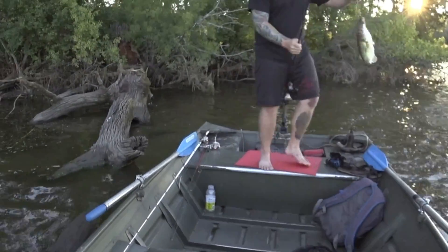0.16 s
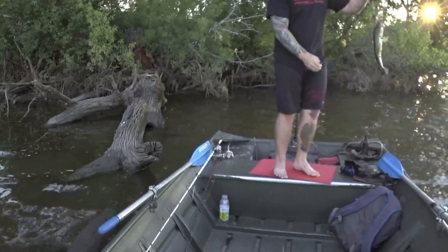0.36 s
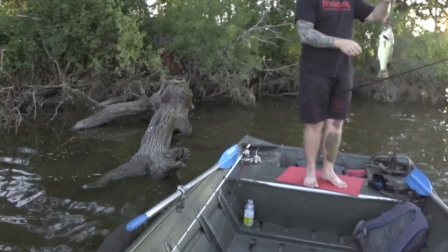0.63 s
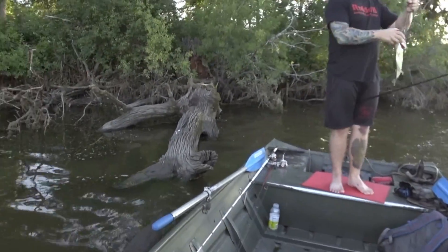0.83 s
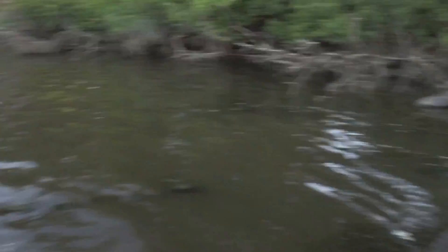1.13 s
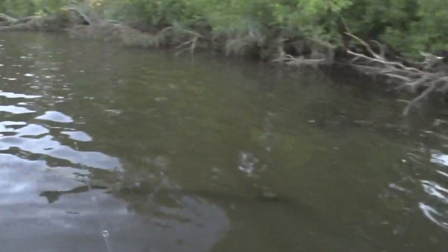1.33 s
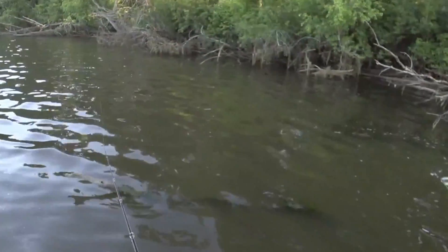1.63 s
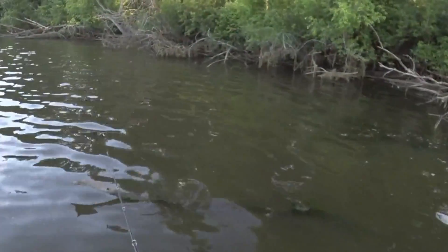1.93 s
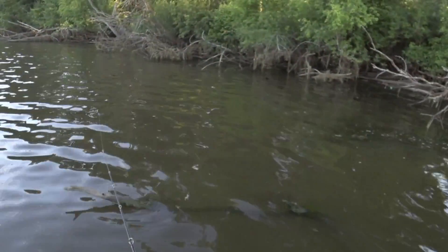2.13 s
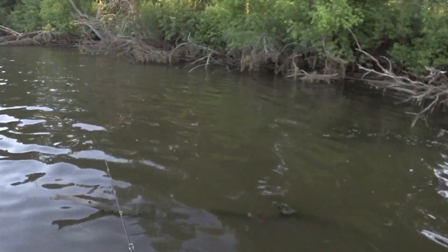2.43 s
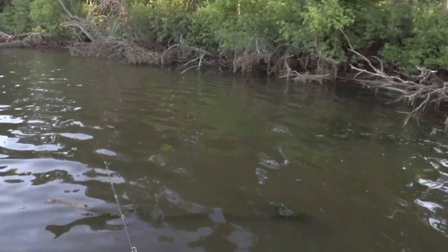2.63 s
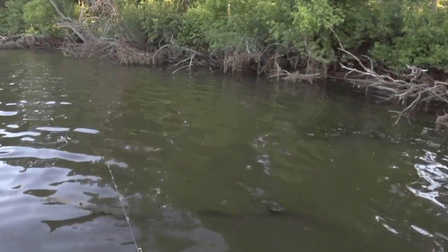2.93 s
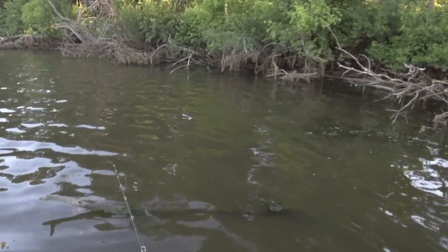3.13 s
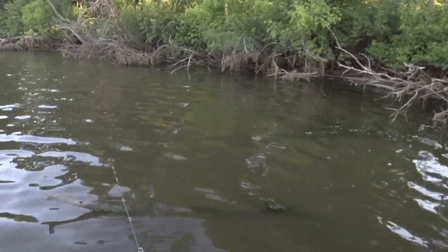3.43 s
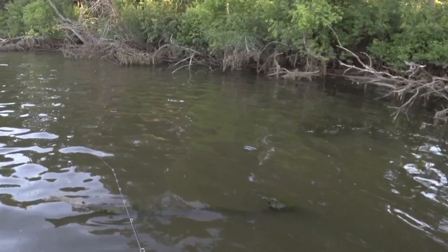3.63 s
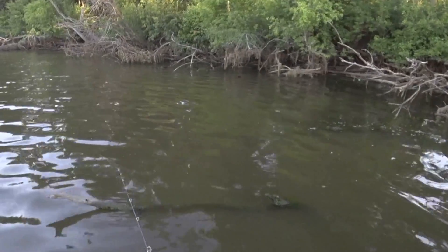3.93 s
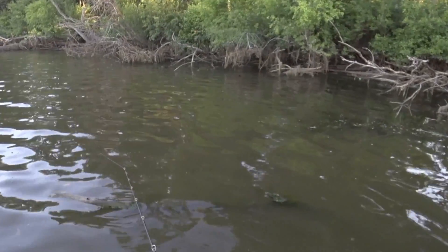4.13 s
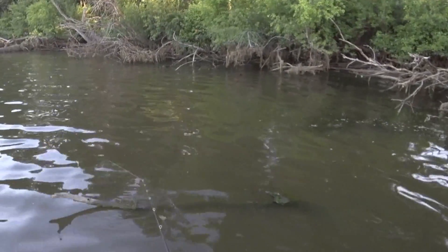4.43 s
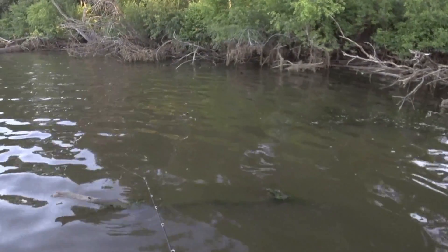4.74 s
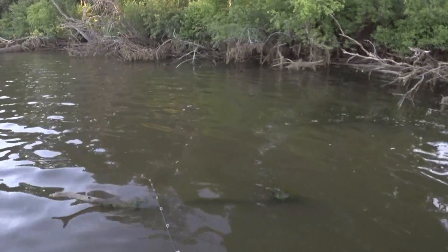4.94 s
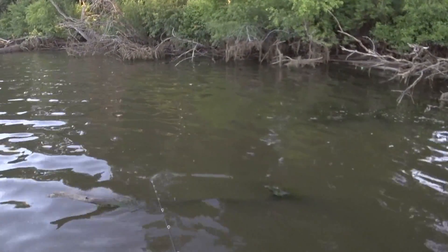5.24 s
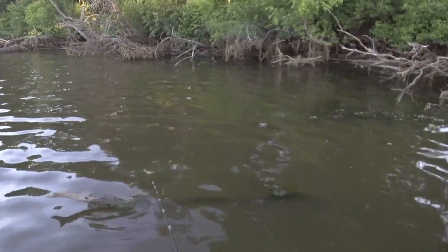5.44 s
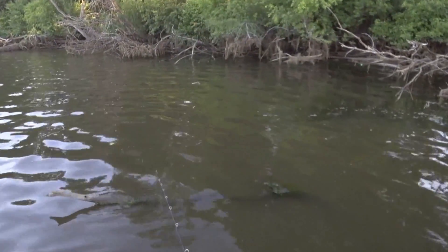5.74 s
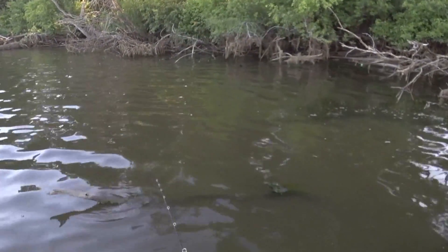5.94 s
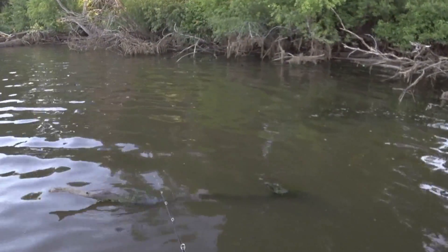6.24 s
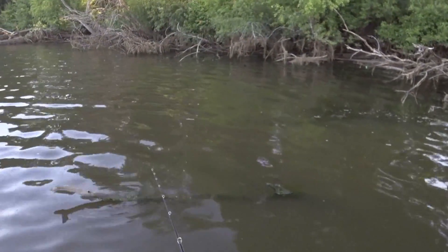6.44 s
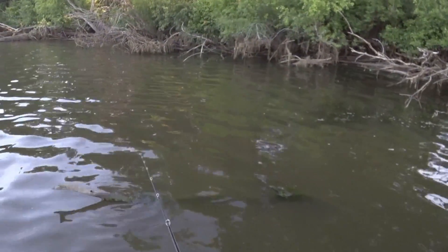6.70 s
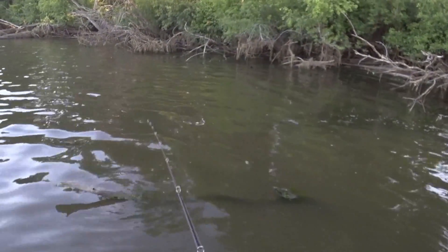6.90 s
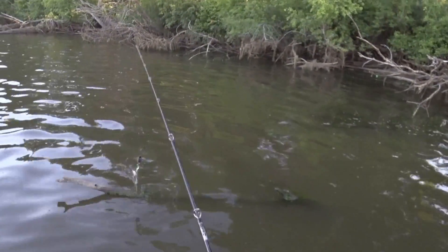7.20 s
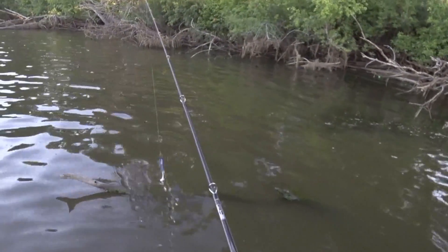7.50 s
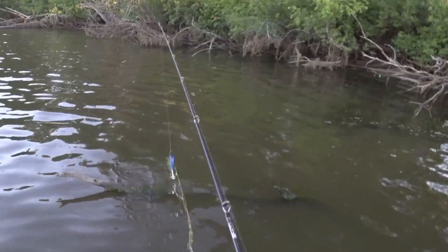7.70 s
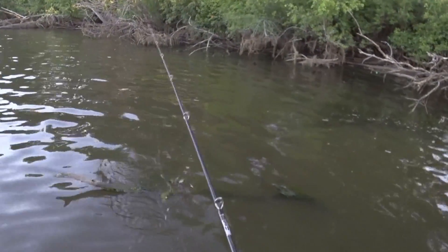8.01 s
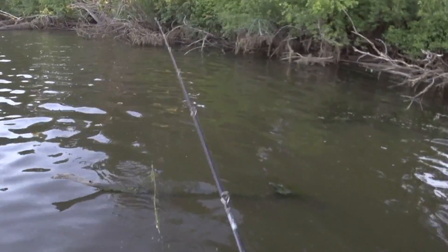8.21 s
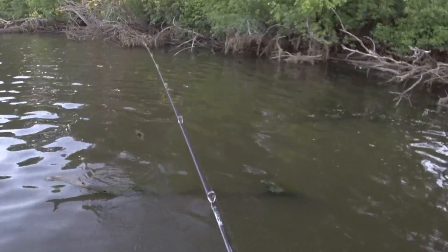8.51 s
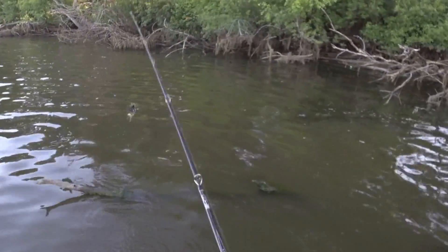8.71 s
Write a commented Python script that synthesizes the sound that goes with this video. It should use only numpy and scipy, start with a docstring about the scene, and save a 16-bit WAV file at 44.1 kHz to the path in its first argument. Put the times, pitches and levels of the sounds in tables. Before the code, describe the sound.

Quiet lake fishing: resonant hull thuds, small clicks, camera-handling bumps and watery plops, with thin whistles from the trees and a low wash.

```python
"""Fishing from a small metal boat on a quiet lake, under a high hiss from a wooded shore.
First come hollow knocks (resonating hull panels), tackle ticks, rasps and thin whistles echoed by trees.
From 1.8 s the grip on the camera creaks, then bumps; near 2.7 s the first air pockets plop at the hull.
Near 3 s the line sizzles through the rod rings on the right and chirping bubbles gurgle along the hull.
Knocks, plops, bumps and whistles go on, with two more gurgles near 8 s, over the low wash of the lake."""
import sys
import numpy as np
from scipy import signal
from scipy.fft import rfft, irfft
from scipy.io import wavfile
from scipy.ndimage import uniform_filter1d

SR = 44100
rng = np.random.default_rng(int(sys.argv[2]) if len(sys.argv) > 2 else 0)


def bounce(signal):
    """Save signal as a 16-bit WAV file at the path given by the first command-line argument."""
    frames = np.transpose(np.atleast_2d(signal))
    limited = np.clip(frames, -1, 1)
    pcm = np.round(limited * 32767).astype(np.int16)
    wavfile.write(sys.argv[1], SR, pcm)


N = 390726
TIME = np.arange(N) / SR
SIZE = 16384  # samples in the response to one blow
T = np.arange(SIZE) / SR
HZ = np.fft.rfftfreq(SIZE, 1 / SR) + 1  # raised by 1 Hz to keep logarithms finite
LEAD_IN = .006  # s of room ahead of the centre of a blow
PORTS = np.array([[1], [-1]])  # opposite signs for the left and right microphone ports


def amp(db):
    """Level to amplitude: 20 dB is a factor of ten."""
    return 10 ** (np.asarray(db) / 20)


def evened(x):
    """Normalisation to a root-mean-square value of 1."""
    return x / np.sqrt(np.mean(x ** 2) + 1e-20)


def read(points, hz):
    """A spectrum joined by straight lines on a log-frequency axis."""
    f, value = np.transpose(points)
    return np.interp(np.log(hz + 1), np.log(f), value)


def follow(curve, t):
    """Linear interpolation of a curve in time."""
    return np.interp(t, *np.transpose(curve))


def add(mix, s, sound):
    """Superposition: pressures add from s seconds on, cut at the end of the mix."""
    part = mix[:, max(round(s * SR), 0):][:, :sound.shape[1]]
    part += sound[:, :part.shape[1]]


def band(hz, octaves):
    """A resonance bell, Gaussian on the log-frequency axis."""
    return np.exp(-(np.log2(HZ / hz) / (2 * octaves)) ** 2)


def blow(gain):
    """Zero-phase impact: a short symmetric wavelet with this spectrum, centred on the lead-in."""
    return gain * np.exp(-2j * np.pi * HZ * LEAD_IN)


def causal(gain):
    """The minimum-phase response with this gain: it starts sharply and rings afterwards."""
    log_gain = np.log(gain / gain.max() + 1e-4)
    circle = np.concatenate([log_gain, log_gain[-2:0:-1]])
    return np.exp(np.conj(signal.hilbert(circle)))[:len(HZ)]


def contacts(envelope, per_s):
    """Repeated impact: random separate bounces of uneven size under an envelope, of energy 1."""
    train = (rng.random(SIZE) < per_s / SR) * rng.standard_normal(SIZE) * envelope
    return rfft(train / (np.linalg.norm(train) + 1e-12))


def scatter(envelope, same):
    """Diffuse reverberation: dense noise under an envelope, partly alike at both ports, of energy near 1."""
    shared, *own = rng.standard_normal((3, SIZE))
    same = np.clip(same, 0, 1)
    noise = np.sqrt(same) * shared + np.sqrt(1 - same) * np.array(own)
    return rfft(noise * envelope / np.linalg.norm(envelope))


def ports(spectrum, db, pan_db, lead):
    """Interaural-style level and phase (lead/rad) differences; db is the blow's energy spread over 10 ms."""
    level = amp(pan_db / 2 * PORTS)
    phase = np.exp(.5j * lead * PORTS)
    pair = irfft(spectrum * level * phase)
    return amp(db) * evened(pair) * np.sqrt(SR / 10 ** 2 / SIZE)


def air(colour_db, same, patchy_db):
    """Partly coherent stereo noise with drifting patches; colour_db(t, hz) gives its relative spectrum."""
    frames, hz = N // 256 + 5, np.fft.rfftfreq(1024, 1 / SR)
    a, b, c, d, patches = rng.standard_normal((frames, 513, 5)).T
    patches = uniform_filter1d(patches, size=5, axis=0)
    patches = evened(uniform_filter1d(patches, size=9, axis=1))
    same, left = np.clip(same, -1, 1), a + 1j * b
    right = same * left + np.sqrt(1 - same ** 2) * (c + 1j * d)
    t = np.arange(frames) * 256 / SR
    z = np.array([left, right]) * amp(colour_db(t, hz[:, None]) + patchy_db * patches)
    return evened(signal.istft(z, nperseg=1024, noverlap=768)[1][:, :N])


def knocks(first=0.12, start=0.55, attack_cycles=1.9, t60=0.15, damping=0.34, wash_db=-2.5, tail_db=-14.5,
           tail_t60=0.33, body_db=-9, note_db=-2, note_octaves=0.029, lead=0.67, uneven_db=3):
    """Impact on resonant panels: each blow swells by bouncing about the hull, then darkens as it rings on."""
    # hollow knocks in the hull: t/s, level/dB, f/Hz, width/octaves, swell/s, left over right/dB
    knock_list = [(0.043, -29, 1946, 0.14, 0.007, .5), (0.119, -57.5, 440, 0.4, .004, 1),
                  (0.682, -40.5, 1536, 0.17, 0.024, 4), (.688, -50.5, 525, 0.37, 0.0032, 1),
                  (.732, -44.5, 2550, 0.14, 0.0062, 1), (1.117, -50, 473, 0.9, 0.017, -2.5),
                  (1.278, -37.5, 1830, 0.12, .012, -6), (1.285, -49, 780, 0.4, 0.0051, -6),
                  (1.416, -50.5, 825, 0.63, 0.0041, -11), (1.422, -40, 2900, 0.18, 0.00087, -5),
                  (1.497, -37, 503, 0.22, 0.019, -2), (1.521, -30, 872, 0.23, .0026, -6),
                  (1.524, -45.5, 3110, 0.056, 0.0017, -4), (1.629, -44.5, 800, 0.23, 0.0012, -7.5),
                  (1.814, -33, 748, 0.31, 0.017, -5.5), (1.951, -42.5, 483, 0.34, 0.0019, -3),
                  (2.065, -51, 3220, 0.091, .003, 5), (2.37, -35, 1400, 0.21, 0.0068, -3),
                  (2.737, -42, 478, 0.29, 0.012, -5), (2.909, -33.5, 1227, 0.2, 0.016, -7),
                  (3.464, -56, 670, 0.19, 0.0072, -2), (3.809, -30.5, 746, 0.47, 0.0039, -6),
                  (3.835, -29, 814, 0.42, 0.019, -5), (4.292, -31, 1965, 0.17, 0.007, -7),
                  (4.702, -35.5, 540, 0.27, 0.0054, -2), (4.889, -46, 1750, 0.21, 0.016, -4),
                  (5.462, -42, 2810, 0.1, 0.003, -3), (5.466, -46, 2070, 0.3, 0.0097, -7),
                  (5.846, -45.5, 490, 0.22, 0.0041, 8), (6.089, -28, 980, 0.32, 0.019, -4),
                  (6.09, -46.5, 546, 0.4, 0.016, 1), (6.086, -38.5, 1830, 0.15, 0.0018, -3),
                  (6.81, -41.5, 486, 0.27, 0.025, -3.5), (7.542, -47, 2210, 0.1, 0.011, -3),
                  (7.874, -55, 2820, 0.45, 0.0096, -2), (7.96, -44, 1086, 0.24, 0.0078, -5.5),
                  (8.115, -38, 728, 0.18, 0.021, -4.5), (8.209, -43.5, 2970, 0.11, 0.0032, 3),
                  (8.213, -47, 2220, 0.2, 0.0068, -5), (8.378, -54.5, 2710, 0.36, 0.008, 2),
                  (8.668, -37.5, 640, 0.36, 0.014, -7)]
    # panel resonances of the hull: f/Hz, width/Hz, gain/dB
    hull = [(638, 13, 3), (1075, 24, 4), (1154, 56, 1.5), (1900, 46, -12.5)]
    out = np.zeros((2, N))
    panels = amp(sum(db / (1 + (2 * (HZ - hz) / width) ** 2) for hz, width, db in hull))
    for s, db, hz, octaves, swell, pan_db in knock_list:
        after = np.maximum(T - swell, 0) * (hz / 10 ** 3) ** damping  # high notes die sooner
        rise = np.interp(T, [0, swell], [start, 1]) * np.minimum(T * hz / attack_cycles, 1)
        clumps = np.interp(T, T[::SIZE // 64], rng.standard_normal(64))  # the late bounces come in clumps
        fast = rise * amp(-60 * after / t60)
        slow = rise * amp(uneven_db * clumps) * amp(-60 * after / tail_t60)
        dull = 1 / (1 + (HZ / hz / 1.3) ** 4)  # late reflections lose their top
        early = contacts(fast, per_s=1600) + amp(wash_db) * scatter(fast, same=0.92)
        late = dull * (scatter(slow, same=0.94) + contacts(slow, per_s=280))
        ring = early + amp(tail_db) * late
        # a broad thud with a hollow note in its middle; broad blows also stir the deeper body of the boat
        colour = band(hz, octaves) + amp(note_db) * band(hz, note_octaves)
        colour += amp(body_db) * octaves * band(np.sqrt(hz * 330), 0.68)
        colour /= 1 + (HZ / 3400) ** 16
        impact = blow(np.sqrt(colour)) * causal(np.sqrt(colour) * panels)
        add(out, s - LEAD_IN, ports(impact * (first + ring), db, pan_db, lead))
    return out


def plops(octaves_per_s=2.7, tail_db=-11, t60=.2, pan_db=-2.0):
    """Bubble resonance: a trapped pocket of air rings, rising a little in pitch, and the hull echoes it."""
    # round plops of water against the hull: t/s, level/dB, f/Hz, swell/s
    plop_list = [(2.737, -42.5, 610, 0.0031), (3.818, -31, 576, 0.0031), (3.868, -42, 616, 0.0047),
                 (4.723, -35.5, 573, 0.0045), (4.722, -54.5, 227, .005), (6.089, -31, 1166, 0.012),
                 (6.8214, -40.5, 570, 0.0022), (6.843, -51, 227, 0.0055), (8.135, -37.5, 778, 0.0032),
                 (8.659, -36, 590, 0.0037), (8.666, -35.5, 651, 0.011)]
    out = np.zeros((2, N))
    for s, db, hz, swell in plop_list:
        u = T / swell
        pitch = hz * 2 ** (octaves_per_s * (T - swell))
        note = (u * np.exp(1 - u)) ** 2 * np.sin(2 * np.pi * np.cumsum(pitch) / SR)
        echo = scatter(amp(-60 * T / t60), same=0.39)
        add(out, s, ports(rfft(note) * (1 + amp(tail_db) * echo), db, pan_db, 0.39))
    return out


def gurgles(per_s=100, low_hz=225, high_hz=590, cycles=1.46, top_octaves_per_s=28, top_spread_db=10, lead=1.5):
    """Bubble chirps: uneven small bubbles each ring for a few cycles as their pitch slides up."""
    # water gurgling along the hull: t/s, length/s, level/dB
    gurgle_list = [(3.07, 0.094, -55), (3.307, 0.17, -55.5), (7.819, 0.112, -52.5), (8.058, 0.15, -51)]
    out, t = np.zeros((2, N)), T[:SIZE // 8]
    for s, length, db in gurgle_list:
        run = np.zeros((2, 2 * SIZE))
        for k, (when, size, strength, glide, side) in enumerate(rng.random((60, 5))):
            at, hz = (k + when) / per_s, low_hz * (high_hz / low_hz) ** size
            if at < length:
                u = t * hz / cycles
                phase = 2 * np.pi * np.cumsum(hz * 2 ** (top_octaves_per_s * glide * t)) / SR
                shift = lead * (2 * side - 1) * PORTS  # up to lead/rad either way at each port
                pulse = (u * np.exp(1 - u)) ** 2 * np.sin(phase + shift)
                add(run, at, amp(top_spread_db * strength) * pulse)
        add(out, s, amp(db) * run / run[:, :int(length * SR)].std())
    return out


def ticks(octaves=0.2, ring_db=-9, t60=0.14, lead=0.91):
    """Impulsive contact: a sharp snap of the tackle; the quieter ones chatter on relatively more."""
    # dry ticks of the tackle: t/s, level/dB, f/Hz, left over right/dB
    tick_list = [(0.019, -45.5, 1500, 0), (0.601, -36.5, 1940, 0), (1.212, -57, 2030, -18),
                 (1.398, -56, 2730, -17), (1.934, -42.5, 1710, -16), (1.97, -43, 2400, -14),
                 (1.988, -43.5, 2110, -14), (2.549, -49, 1280, -21), (2.596, -50, 2330, -17),
                 (2.632, -55.5, 2700, -23), (3.02, -49.5, 1720, -28), (3.086, -46, 2300, -25),
                 (3.119, -46, 1610, -29), (3.194, -48, 1690, -18), (3.203, -49, 2070, -16),
                 (3.277, -42.5, 2270, -13), (3.287, -51, 2220, -13), (5.109, -48, 2550, -17),
                 (5.153, -56.5, 1510, -26), (7.245, -63.5, 2650, 1), (8.05, -54, 2460, -17),
                 (8.761, -46.5, 2440, -16)]
    out = np.zeros((2, N))
    fade = amp(-60 * T / t60)
    for s, db, hz, pan_db in tick_list:
        colour = band(hz, octaves) + amp(-22.0) * band(hz / 2, 0.36)
        colour /= 1 + (HZ / 3050) ** 20
        chatter_db = ring_db - min(db + 36.5, 0) / 2.9
        chatter = amp(chatter_db) * (contacts(fade, per_s=610) + scatter(fade, same=0.65) / 2)
        add(out, s - LEAD_IN, ports(blow(colour) * (1 + chatter), db, pan_db, lead))
    return out


def rasps(octaves_at_10k=0.12, narrowing=2.04, t60=0.12, snap_db=-7.0, wash_db=-6):
    """Stick-slip friction: a sharp first contact, then a brief chatter of finer ones."""
    # tiny bright ticks of the line and tackle in the rod rings: t/s, level/dB, f/Hz, left over right/dB
    rasp_list = [(0.117, -54.5, 8460, -6), (0.469, -63, 9350, -4.5), (1.425, -74, 10600, -17),
                 (1.474, -72, 9250, -12), (2.066, -66, 9300, -8), (3.007, -49, 11150, -32),
                 (3.085, -48, 11000, -22), (3.099, -53, 9600, -25), (3.117, -52.5, 8600, -19),
                 (3.156, -57, 11200, -16), (3.27, -57, 10900, -23), (6.999, -66.5, 9100, -7),
                 (7.993, -48.5, 11880, -33), (8.378, -47.5, 6040, -4.5)]
    out = np.zeros((2, N))
    envelope = amp(-60 * T / t60)
    for s, db, hz, pan_db in rasp_list:
        grains = amp(snap_db) + contacts(envelope, per_s=700) + amp(wash_db) * scatter(envelope, same=1.0)
        octaves = octaves_at_10k * (10 ** 4 / hz) ** narrowing  # higher rasps are thinner
        add(out, s, ports(causal(band(hz, octaves)) * grains, db, pan_db, 0))
    return out


def sizzle(start=2.93, peak=3.03, end=3.43, hz=10850, octaves=0.021, db=-80.5, pan_db=-22):
    """Granular friction: the line running through the rings excites a thin band with random grains."""
    out, length = np.zeros((2, N)), int((end - start) * SR)
    pull = np.interp(start + np.arange(length) / SR, [start, peak, end], [0, 1, 0])
    grains = (rng.random(length) < 420 / SR) * rng.standard_normal(length) * pull
    sound = evened(signal.fftconvolve(grains, irfft(causal(band(hz, octaves))))[:length])
    add(out, start, sound * amp(db + pan_db / 2 * PORTS))
    return out


def bump(db, hz, lead, octaves=0.39, push_db=-24, ring_db=-12, t60=0.19):
    """Structure-borne sound: a short thud in the camera shell, its port phase difference fading in the bass."""
    colour = band(hz, octaves) + amp(push_db) * band(hz / 1.95, 0.57)
    colour /= 1 + (HZ / 1000) ** 8
    ring = amp(ring_db) * scatter(amp(-60 * T / t60), same=0.043)
    return ports(blow(colour) * (1 + ring), db, 0, lead * np.minimum(HZ / 220, 1))


def grip(rise_s=0.035, fall_s=0.077, steady_from_s=1.8, steady_db=-77):
    """Amplitude envelope of the hand: each shift rises, holds and dies away over a faint steady creaking."""
    # shifts of the grip on the camera: t/s, length/s, level/dB
    shift_list = [(1.832, 0.56, -76), (3.945, 0.11, -63), (5.316, 0.41, -65), (5.82, 0.15, -65.5),
                  (6.426, 0.22, -76), (7.035, 0.14, -71.5)]
    envelope = amp(steady_db) * (TIME > steady_from_s)
    for s, length, db in shift_list:
        corners = [s - rise_s, s, s + length, s + length + fall_s]
        envelope = envelope + amp(db) * np.interp(TIME, corners, [0, 1, 1, 0]) ** 2
    return envelope


def handling(per_s=85, spread_db=8.0, lead=2.14, low_hz=185, high_hz=520, creak_octaves=0.28,
             weight_db_per_octave=2):
    """Random pulse trains: bumps, and a patter of small rounded creaks in the grip; low creaks are heavier."""
    # bumps on the camera body: t/s, level/dB, f/Hz
    bump_list = [(2.393, -31.5, 466), (2.943, -41, 319), (2.989, -37.5, 467), (2.998, -34, 430),
                 (3.093, -43, 276), (3.3, -36, 380), (3.308, -42, 390), (3.467, -38.5, 420),
                 (3.938, -43.5, 343), (3.96, -45, 319), (4.042, -52.5, 334), (5.174, -47.5, 316),
                 (5.361, -43, 332), (5.37, -34.5, 304), (5.818, -42.5, 350), (5.854, -35, 320),
                 (5.871, -40, 342), (6.058, -31.5, 365), (6.443, -50.5, 255), (6.493, -47, 348),
                 (6.916, -52.5, 256), (7.076, -49, 242), (7.857, -44, 293), (7.896, -44, 253),
                 (7.934, -38.5, 272), (7.964, -41, 267), (8.069, -35, 387), (8.181, -40.5, 330),
                 (8.584, -35, 430)]
    out, patter = np.zeros((2, N)), np.zeros((2, N))
    for s, db, hz in bump_list:
        add(out, s - LEAD_IN, bump(db, hz, lead * rng.choice([-1, 1], p=[1 / 4, 3 / 4])))
    pitches = np.geomspace(low_hz, high_hz, num=10)
    for hz in pitches:
        strength = amp(spread_db * np.minimum(rng.exponential(1, N), 2))
        train = (rng.random(N) < per_s / len(pitches) / SR) * strength
        weight_db = -weight_db_per_octave * np.log2(hz / low_hz)
        creak = bump(weight_db, hz, lead=0.96, octaves=creak_octaves, push_db=-18.5, ring_db=-3.0)
        patter += signal.oaconvolve(train[None], creak, axes=1)[:, :N]
    return out + evened(patter) * grip()


def slow_noise(cutoff_hz, count):
    """Low-pass noise: as a modulator its cutoff sets how broad the pitch sounds."""
    low_pass = signal.butter(2, cutoff_hz, fs=SR, output="sos")
    return evened(signal.sosfilt(low_pass, rng.standard_normal(SR)))[-count:]


def whistles(blur_hz=330, pure_hz=30, pure=1.0, fall_hz_per_s2=13000, trees_t60=0.31,
             lowest_hz=3020, highest_hz=6500):
    """Modulated tones: a falling blur settles on a thin pitch, heard as the long echo of the trees."""
    # faint falling whistles on the shore: t/s, length/s, last f/Hz, level before the echo/dB
    whistle_list = [(0.274, 0.25, 4300, -62), (1.002, 0.25, 3064, -63.5), (1.6, 0.29, 2960, -61),
                    (4.468, 0.12, 6050, -58), (4.969, 0.31, 5420, -59.5), (5.314, 0.26, 3220, -60.5),
                    (5.838, 0.17, 5950, -61.5), (6.398, 0.27, 2875, -56.5), (7.07, 0.52, 3213, -60.5),
                    (7.59, 0.22, 2960, -64), (8.119, 0.45, 3490, -64)]
    out = np.zeros((2, N))
    for s, length, last_hz, db in whistle_list:
        u = np.linspace(0, 1, int(length * SR))
        blur, thin = slow_noise(blur_hz, len(u)), slow_noise(pure_hz, len(u))
        # the fall grows with length squared, so short whistles nearly hold their pitch
        pitch = last_hz + fall_hz_per_s2 * length ** 2 * (1 - u) ** 1.4
        strength = blur * np.sqrt(1 - u) + pure * thin * u ** 2
        note = strength * np.sin(2 * np.pi * np.cumsum(pitch) / SR)
        note = evened(note)[None] * signal.windows.tukey(len(u), .35)
        passband = 1 / (1 + (lowest_hz / HZ) ** 40 + (HZ / highest_hz) ** 40)
        trees = irfft(scatter(amp(-60 * T / trees_t60), same=0.63) * blow(passband))
        add(out, s, amp(db) * signal.fftconvolve(trees, note, axes=1))
    return out


def held_notes(waver=0.0031, echo_db=-3, trees_t60=1.0):
    """Direct sound plus reverberation: level whistles waver slightly and linger among the trees."""
    # thin whistles that hold their pitch: t/s, length/s, f/Hz, level/dB
    note_list = [(2.165, 0.089, 3420, -64), (2.936, 0.16, 3046, -62.5), (4.117, 0.18, 3030, -68.5),
                 (8.424, 0.073, 4110, -61), (8.762, .1, 3060, -69.5)]
    out = np.zeros((2, N))
    for s, length, hz, db in note_list:
        count = int(length * SR)
        drift = np.interp(np.arange(count), np.linspace(0, count, num=10), rng.standard_normal(10))
        phase = 2 * np.pi * np.cumsum(hz * (1 + waver * drift)) / SR
        note = signal.windows.tukey(count, .5) * np.sin(phase)
        trees = irfft(1 + amp(echo_db) * scatter(amp(-60 * T / trees_t60), same=0.073))
        heard = signal.fftconvolve(trees, note[None], axes=1)
        add(out, s, amp(db) * heard / heard[:, :count].std())
    return out


def sweep_hz(t, sink_s=0.14, low_hz=3280, top_hz=4430, climb_hz_per_s=164):
    """Exponential glide: the hiss's bright part sits high, sinks ever faster, and starts again."""
    # moments at which the bright part has sunk to its lowest: t/s
    sweep_ends = [.62, 1.302, 2.4, 3.15, 4.3, 5.62, 6.643, 7.62, 8.55]
    ends = np.append(np.sort(sweep_ends), np.inf)
    sunk = np.exp((t - ends[np.searchsorted(ends, t)]) / sink_s)
    return (1 - sunk) * (top_hz + climb_hz_per_s * t) + sunk * low_hz


def shore(hiss_db=-1.5, focus_db=4.5, focus_hz=900, flutter_db=1.02, lake_db=-70.0):
    """Filtered noise: a fluttering high hiss, its brightest part sweeping down, over the wash of the lake."""
    # spectrum of the hiss: f/Hz, relative level per Hz/dB
    hiss_spectrum = [(1500, -18.5), (2500, -39.5), (2850, -17.5), (3100, -4), (3600, -2), (4400, -1.5),
                     (5200, -1), (6000, -2.5), (6700, -11.5), (7800, -17), (8700, -29.5), (10600, -27.5),
                     (11500, -34.5)]
    # course of the hiss, to which hiss_db is added: t/s, relative level/dB
    hiss_course = [(0.0, -66.5), (2.17, -59.5), (2.76, -68), (3.06, -59), (4.24, -63), (4.59, -60),
                   (4.74, -65), (5.23, -57), (5.53, -61.5), (8.17, -59.5), (8.31, -54.5), (8.86, -61)]
    # spectrum of the lake: f/Hz, relative level per Hz/dB
    lake_spectrum = [(60, -38), (120, -41), (250, -12), (500, -2.5), (900, 0), (1600, -9.5), (2500, -11.5),
                     (5000, -1), (11000, -37.5)]

    def colour_db(t, hz):
        return read(hiss_spectrum, hz) + focus_db * np.exp(-((hz - sweep_hz(t)) / focus_hz) ** 2)

    flutter = np.zeros(N)
    for hz in np.geomspace(2.5, 20, num=20):
        flutter += np.sin(2 * np.pi * (hz * TIME + rng.random())) / np.sqrt(hz)
    level_db = hiss_db + follow(hiss_course, TIME) + flutter_db * evened(flutter)
    hiss = air(colour_db, same=0.89, patchy_db=4.0) * amp(level_db) * amp([[-.2], [.6]])  # leans right
    lake = amp(lake_db) * air(lambda t, hz: read(lake_spectrum, hz), same=0.3, patchy_db=5.0)
    return signal.sosfilt(signal.butter(2, 130, "highpass", fs=SR, output="sos"), hiss + lake)


def scene():
    """Superposition of all sources, from the hull to the far shore."""
    boat = knocks() + plops() + gurgles()
    tackle = ticks() + rasps() + sizzle()
    return boat + tackle + handling() + whistles() + held_notes() + shore()


def record(dry, edge_hz=11100):
    """Band limitation: the recorder's steep linear-phase low-pass."""
    low_pass = signal.firwin(511, edge_hz, window=("kaiser", 9), fs=SR)
    return signal.oaconvolve(dry, low_pass[None], "same")


dry = scene()
out = record(dry)
bounce(out)
```